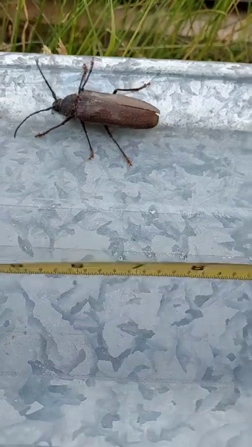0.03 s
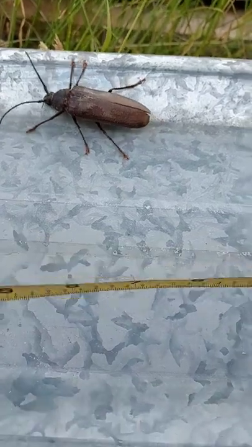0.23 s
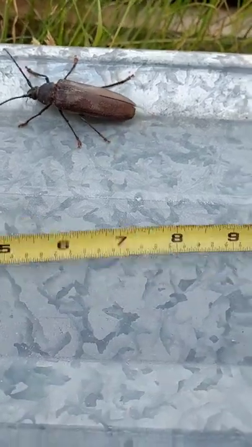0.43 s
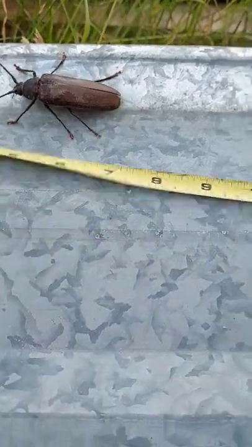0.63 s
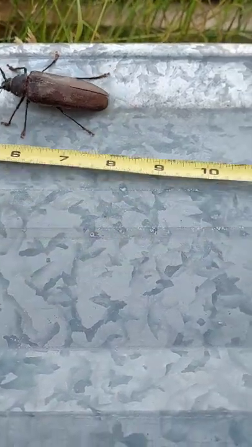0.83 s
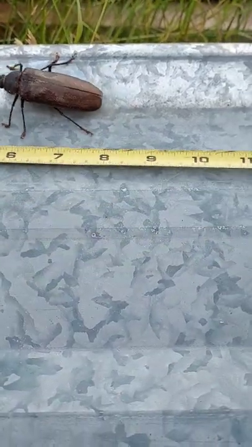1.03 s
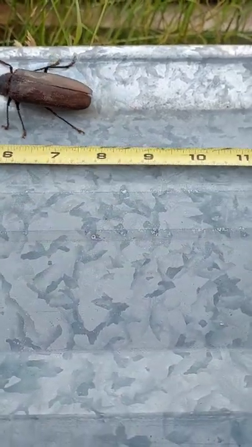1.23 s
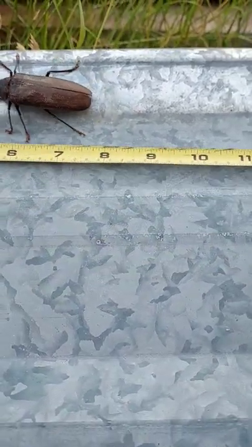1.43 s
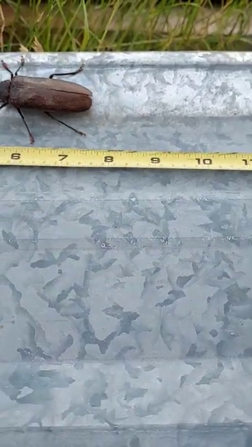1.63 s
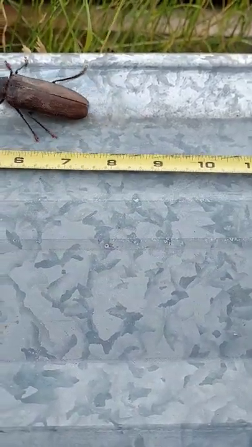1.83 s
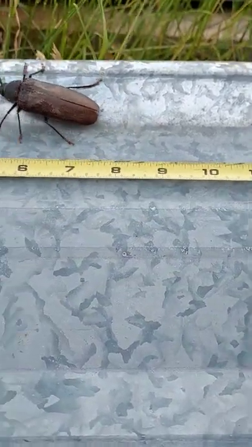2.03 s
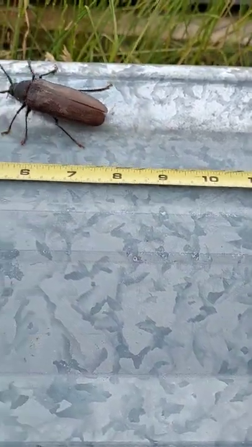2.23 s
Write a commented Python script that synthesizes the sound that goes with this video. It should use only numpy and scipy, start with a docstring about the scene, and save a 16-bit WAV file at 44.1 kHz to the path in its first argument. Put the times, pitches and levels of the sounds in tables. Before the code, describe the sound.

Tape measure blade knocking and scraping on sheet metal, settling into faint ticks.

```python
"""Tape measure on a metal sheet

A steel tape measure knocks on a ribbed galvanized sheet outdoors, close to the microphone.
Each knock sets the sheet ringing in a dense wash of modes; the blade ticks as it flexes,
scrapes into place and is then nudged gently along. The sheet rumbles under the handling."""
import sys
import numpy as np
from scipy import signal
from scipy.fft import rfft, irfft, next_fast_len
from scipy.io import wavfile

SR = 44100
rng = np.random.default_rng(int(sys.argv[2]) if len(sys.argv) > 2 else 0)


def store_wav(level_fs):
    """Save 16-bit WAV to argv[1]."""
    pcm = np.round(np.clip(np.atleast_2d(level_fs), -1, 1) * 32767)
    wavfile.write(sys.argv[1], SR, pcm.T.astype(np.int16))


N = 101429

# the bright colour of the blade's ring: freq_hz, relative_db
BLADE_SPECTRUM = [(200, -65), (1500, -10), (3500, 0), (5800, 1.5), (7800, -5), (10500, 5), (13200, 10),
                  (16000, 0.5)]
# how alike left and right sound: freq_hz, correlation
STEREO_LIKENESS = [(40, 0.044), (130, 0.74), (350, 0.65), (700, 0.65), (1400, -0.0041), (2800, -0.28),
                   (6000, 0.085), (14000, -0.0092)]


def amp(db):
    """Decibels to gain."""
    return 10 ** (np.asarray(db) / 20)


def unit(x):
    """Scales to rms 1."""
    return x / np.sqrt(np.mean(x ** 2) + 1e-20)


def dying(t, t60):
    """Decay by 60 dB in t60 seconds."""
    return np.exp(-np.log(1000) * t / t60)


def curve_at(points, hz):
    """Reads a curve on a log-frequency axis."""
    freqs, values = np.transpose(points)
    return np.interp(np.log(hz + 1), np.log(freqs + 1), values)


def add(mix, start_s, sound):
    """Lays a sound into the stereo mix."""
    part = mix[:, max(round(start_s * SR), 0):][:, :sound.shape[1]]
    part += sound[:, :part.shape[1]]


def stereo_noise(spectrum, size):
    """Coloured noise at rms 1, its width and pan varying with frequency."""
    # pan across the spectrum: freq_hz, left_minus_right_db
    balance = [(40, 12), (90, 5), (1400, 0.2), (2800, -1), (5600, 2), (13000, 4)]
    hz = np.fft.rfftfreq(size, 1 / SR)
    common, separate = rfft(rng.standard_normal((2, size)))
    likeness = np.clip(curve_at(STEREO_LIKENESS, hz), -1, 1)
    lean = amp(curve_at(balance, hz) / 2)
    left = common * lean
    right = (likeness * common + np.sqrt(1 - likeness ** 2) * separate) / lean
    return unit(irfft(np.array([left, right]) * amp(curve_at(spectrum, hz)), size))


def shelves(x, bass_db, treble_db, bass_hz=360, treble_hz=2570):
    """Raises or lowers the bass and the treble."""
    size = next_fast_len(x.shape[1] + 2048)
    hz = np.fft.rfftfreq(size, 1 / SR)
    low = 1 / (1 + (hz / bass_hz) ** 4)
    high = 1 - 1 / (1 + (hz / treble_hz) ** 4)
    return irfft(rfft(x, size) * amp(bass_db * low + treble_db * high), size)[:, :x.shape[1]]


def air(level_db=-66):
    """A faint, steady bed of outdoor air."""
    # colour of the air: freq_hz, relative_db
    spectrum = [(25, -14.5), (130, -20), (330, -9.5), (560, -0.5), (1200, -6), (2500, -15.5), (8000, -31),
                (15000, -36)]
    return amp(level_db) * stereo_noise(spectrum, N)


def rumble(trim_db=-4):
    """Low flexing of the sheet under the handling."""
    # rise and fall of the rumble: time_s, relative_db
    envelope = [(0.0, -52.5), (0.29, -46.5), (0.36, -32.5), (0.47, -38.5), (0.49, -32.5), (0.85, -31.5),
                (1.52, -61), (1.61, -52.5), (1.639, -65.5), (2.13, -65.5), (2.3, -49)]
    # colour of the rumble: freq_hz, relative_db
    spectrum = [(20, -26.5), (33, -4.5), (48, 0.5), (75, -7), (120, -6), (180, -12), (400, -45)]
    times_s, levels_db = np.transpose(envelope)
    return stereo_noise(spectrum, N) * amp(trim_db + np.interp(np.arange(N) / SR, times_s, levels_db))


def sheet_ring(modes_db):
    """The sheet's answer to a tap at one spot: crowded modes, with a few standing out."""
    # colour of the dense wash: freq_hz, relative_db
    spectrum = [(30, -46.5), (110, -7), (190, -7.5), (260, -5), (350, -4), (430, -5), (510, 1.5), (700, 1),
                (900, 0.5), (1060, 1), (1220, -0.5), (1580, 3), (1950, -4.5), (2500, -6), (3100, -8),
                (3800, -5.5), (4900, -10), (5800, -7), (7600, -16), (11500, -11), (14500, -14.5),
                (16000, -27)]
    # ring time of the wash: freq_hz, t60_s
    ring_times = [(60, 0.43), (250, 0.99), (700, 0.74), (1500, 0.52), (3000, 0.59), (6000, 0.35),
                  (14000, 0.33)]
    # modes that sing above the wash: pitch_hz, relative_db, t60_s
    modes = [(121, -8, .6), (245, -4, .85), (348, -9, .8), (550, -8, .5), (674, -5, .6), (928, -7, .6),
             (1177, -5, .6), (1218, -4, .6), (1478, -1, .8), (1616, -4, .65), (1727, -7, .65),
             (2202, -10, .8), (2320, -7, .7), (2680, -10, .6)]
    hz, frame_s, bands = signal.stft(stereo_noise(spectrum, SR), SR, nperseg=256)
    bands = bands * dying(frame_s, curve_at(ring_times, hz)[:, None])
    wash = signal.istft(bands, SR, nperseg=256)[1][:, :SR]
    t, tones = np.arange(SR) / SR, np.zeros((2, SR))
    for (pitch_hz, db, t60), (phase, side) in zip(modes, rng.random((len(modes), 2))):
        # a phase gap between left and right gives the mode its width
        gap = np.arccos(np.clip(curve_at(STEREO_LIKENESS, pitch_hz), -1, 1)) * np.sign(side - .5)
        tone = np.sin(2 * np.pi * (pitch_hz * t + phase) + np.array([[0], [gap]])) * dying(t, t60)
        tones += amp(db + modes_db) * unit(tone)
    return (unit(wash) + tones) / np.sqrt(SR)


def knocks():
    """Each landing of the blade gives a short clack and rings the sheet."""
    # the blade lands: start_s, ring_db, bass_db, ring_treble_db, clack_db
    landings = [(0.050, -32.5, 14, 1, -61), (0.2123, 5, -7, 6, -7), (0.277, 0.5, -4.5, -5, -31),
                (0.4856, 9.5, -9.5, 0.5, 4), (0.489, 6.5, -4, 7.5, 2), (0.503, 6, -26, 1.5, -26),
                (0.594, -4, 0.5, -15, -3), (0.641, -0.5, -2, 12.5, 1), (0.751, -4, 7, -21, -9),
                (0.7851, 10, -4.5, 2, 0.5), (0.9103, 3, 1, 3.5, -11.5), (0.957, -0.5, 9, 5.5, -39),
                (1.122, -11, -16, -4.5, -29), (1.498, -17.5, -4, -5, -27), (1.764, -22, -9, -8, -48.5)]
    # quickly damped modes around the struck spot: pitch_hz, relative_db, t60_s
    clack_modes = [(128.3, -2.5, 0.22), (360, 0.5, 0.029), (543, 10.5, 0.017), (732, 9, 0.017),
                   (1216, 5.5, 0.021), (2620, -1.5, 0.015)]
    out, t = np.zeros((2, N)), np.arange(SR // 4) / SR
    clack = sum(amp(db) * np.sin(2 * np.pi * hz * t) * dying(t, t60) for hz, db, t60 in clack_modes)
    clack = unit(clack) / np.sqrt(len(t))
    for start_s, ring_db, bass_db, treble_db, clack_db in landings:
        add(out, start_s, amp(ring_db) * shelves(sheet_ring(modes_db=-12.5), bass_db, treble_db))
        add(out, start_s, amp(clack_db) * shelves(clack[None], bass_db, 0))
    return out


def ticks(ring_t60_s=0.097, crack_db=-14, crack_s=0.003):
    """The thin blade flexes and snaps with a crack and a short, bright ring."""
    # snaps of the blade: start_s, energy_db, brightness_db
    snaps = [(0.052, -24.5, -13), (0.106, -24, 0), (0.1335, -21, 14), (0.155, -14, 4), (0.2133, -1, 3),
             (0.472, -16.5, -5), (0.485, 1.5, -2), (0.578, -8.5, 11), (0.6421, 3, -15), (0.644, -5.5, -20),
             (0.718, -5.5, 13.5), (0.7382, -7, 18), (0.8257, 0, -28), (0.916, -7.5, 19), (1.095, -23, 6),
             (1.481, -25, 0), (1.543, -23, 7), (1.799, -28.5, 9), (1.926, -29, 2)]
    out, t = np.zeros((2, N)), np.arange(SR // 4) / SR
    envelope = dying(t, ring_t60_s) + amp(crack_db) * np.exp(-t / crack_s)
    for start_s, energy_db, brightness_db in snaps:
        ring = shelves(stereo_noise(BLADE_SPECTRUM, len(t)), 0, brightness_db, treble_hz=9600)
        add(out, start_s, amp(energy_db) * unit(ring * envelope) / np.sqrt(len(t)))
    return out


def stroke(t, swell_s, fade_s, swell_power=0.46, fade_db=24):
    """The force of one movement: it grows, then lets go, losing fade_db every fade_s."""
    return np.minimum((t / swell_s) ** swell_power, amp(fade_db * (swell_s - t) / fade_s))


def rib_hollow(x, body_db, centre_hz=680, width_hz=320):
    """The hollow body of a rib, stronger at some spots than at others."""
    hz = np.fft.rfftfreq(x.shape[1], 1 / SR)
    body = amp(body_db / (1 + ((hz - centre_hz) / width_hz) ** 4))
    return irfft(rfft(x) * body, x.shape[1])


def slides(slips_per_s=5000, spread_db=6.5, slip_s=0.0022, sing_db=10.5, sing_width_hz=220):
    """The blade's edge catches on the zinc in many tiny slips that rasp and ring the sheet."""
    # sliding moves: start_s, swell_s, fade_s, ring_db, bass_db, body_db, treble_db, rasp_db, sing_hz
    moves = [(0.1, 0.051, 0.07, -50.5, 15, -2, 7.5, -50, 3770),
             (0.305, 0.067, 0.035, -39.5, 9, -2.5, 3, -35, 3520),
             (0.505, 0.0089, 0.22, -23.5, 7, -3.5, -17, -69, 3900),
             (0.665, 0.13, 0.18, -34.5, 8.5, 4, 8.5, -40, 5660),
             (0.799, 0.029, 0.051, -26.5, -5.5, -4, 2, -30.5, 5600),
             (0.93, 0.029, 0.16, -25, -0.5, -3.5, -3, -39, 5750),
             (1.08, 0.057, 0.44, -45, -2, 0.5, -8, -62, 3900),
             (1.34, 0.016, 0.22, -56, -8, 3, -3, -59.5, 5550),
             (1.468, 0.073, 0.053, -42, -3.5, 0.5, -5, -50.5, 5370),
             (1.76, 0.034, 0.13, -49.5, -11, 4.5, -6, -52.5, 3880),
             (1.849, 0.076, 0.13, -54, -3, 4, -12, -60.5, 3920),
             (1.986, 0.026, 0.42, -44.5, -5, 1.5, -7, -61, 5700),
             (2.08, 0.19, 0.089, -41, -8, 2.5, -9, -49.5, 5730)]
    # colour of the edge's dry rasp: freq_hz, relative_db
    rasp_spectrum = [(200, -24), (520, 10.5), (1000, 5), (1900, 0.5), (2600, 7), (3200, 1), (4000, -1),
                     (4800, -2.5), (6200, -5), (7600, -16), (11500, -13.5), (14500, -8), (16000, -31)]
    out, t = np.zeros((2, N)), np.arange(SR // 2) / SR
    hz = np.fft.rfftfreq(len(t), 1 / SR)
    for start_s, swell_s, fade_s, ring_db, bass_db, body_db, treble_db, rasp_db, sing_hz in moves:
        slips = rng.choice([-1, 1], len(t)) * (rng.random(len(t)) < slips_per_s / SR)
        slips = unit(slips * amp(spread_db * np.minimum(rng.exponential(1, len(t)), 4)))
        force = stroke(t, swell_s, fade_s)
        scrape = signal.fftconvolve((force * slips)[None], sheet_ring(modes_db=-19.5), axes=1)
        add(out, start_s, amp(ring_db) * shelves(rib_hollow(scrape, body_db), bass_db, treble_db))
        # the same slips roughen the rasp, and the blade's free length colours it
        grain = unit(np.sqrt(signal.lfilter([1], [1, -np.exp(-1 / (slip_s * SR))], slips ** 2)))
        sing = amp(sing_db / (1 + ((hz - sing_hz) / sing_width_hz) ** 2))
        rasp = unit(irfft(rfft(stereo_noise(rasp_spectrum, len(t))) * sing, len(t)))
        add(out, start_s, amp(rasp_db) * force * grain * rasp)
    return out


def thuds(t60_s=0.16):
    """Pressure on the sheet sets one of its low modes swinging for a few cycles."""
    # soft flexes of the sheet: start_s, energy_db, pitch_hz
    flexes = [(0.407, -10.5, 62), (0.488, -4, 123.3), (0.593, -8, 113.4), (0.751, -3, 109)]
    out, t = np.zeros((2, N)), np.arange(SR // 4) / SR
    for start_s, energy_db, pitch_hz in flexes:
        thud = np.sin(2 * np.pi * pitch_hz * t) * dying(t, t60_s)
        add(out, start_s, amp(energy_db) * unit(thud[None]) / np.sqrt(len(t)))
    return out


def swishes():
    """Light brushing stirs only the blade's own bright ring, as a soft hiss."""
    # the blade bends and brushes along: start_s, swell_s, fade_s, level_db
    brushes = [(0.435, 0.05, 0.04, -50), (0.705, 0.072, 0.089, -34), (1.47, 0.061, 0.097, -53.5)]
    out, t = np.zeros((2, N)), np.arange(SR // 2) / SR
    for start_s, swell_s, fade_s, level_db in brushes:
        hiss = stereo_noise(BLADE_SPECTRUM, len(t))
        add(out, start_s, amp(level_db) * stroke(t, swell_s, fade_s) * hiss)
    return out


def clangs(spread_ratio=1.24):
    """A patch of metal under the blade rings in a narrow band around one pitch that flutters and dies quickly."""
    # clanging contacts: start_s, pitch_hz, energy_db, t60_s
    contacts = [(0.4959, 1247, 5.5, 0.08), (0.505, 1558, 7, 0.081), (0.6443, 5770, -0.5, 0.08),
                (0.7848, 2340, -2.5, 0.015), (0.793, 5630, -3.5, 0.09), (0.819, 1490, 1.5, 0.15),
                (0.955, 1400, -2, 0.15), (1.545, 900, -19, 0.13)]
    out, t = np.zeros((2, N)), np.arange(SR // 4) / SR
    for start_s, pitch_hz, energy_db, t60_s in contacts:
        band = [(pitch_hz / spread_ratio, -60), (pitch_hz, 0), (pitch_hz * spread_ratio, -60)]
        ring = stereo_noise(band, len(t)) * dying(t, t60_s)
        add(out, start_s, amp(energy_db) * unit(ring) / np.sqrt(len(t)))
    return out


def scene():
    """Blade and sheet over quiet outdoor air."""
    blade = ticks() + swishes() + slides()
    sheet = knocks() + clangs() + thuds() + rumble()
    return blade + sheet + air()


def record(dry, low_cut_hz=55, high_cut_hz=15450):
    """The microphone's low cut, then a steep roll-off of the very top."""
    low_cut = signal.butter(3, low_cut_hz, "highpass", fs=SR, output="sos")
    high_cut = signal.firwin(255, high_cut_hz, window=("kaiser", 9), fs=SR)
    return signal.oaconvolve(signal.sosfilt(low_cut, dry), high_cut[None], "same")


dry = scene()
out = record(dry)
store_wav(out)
```